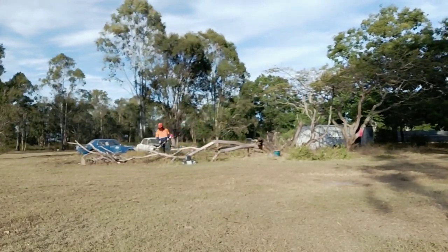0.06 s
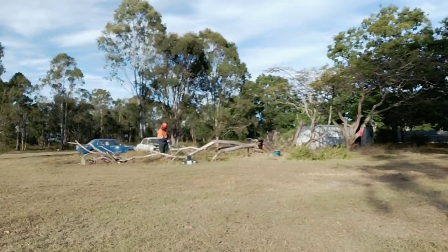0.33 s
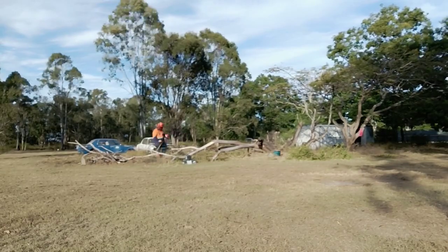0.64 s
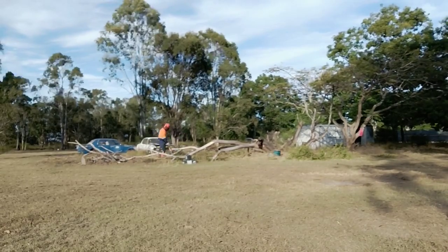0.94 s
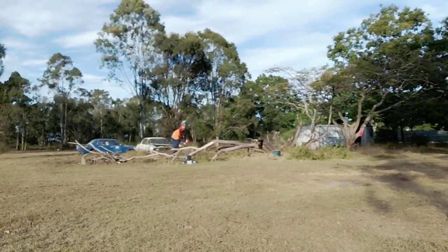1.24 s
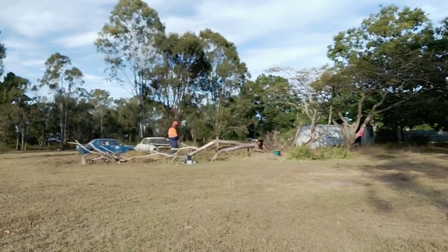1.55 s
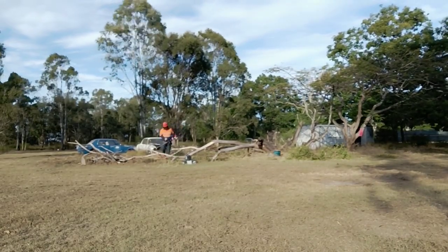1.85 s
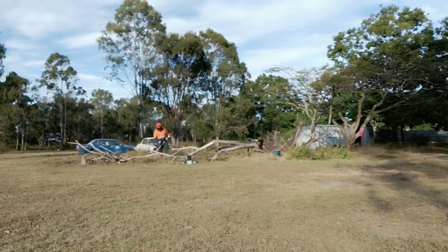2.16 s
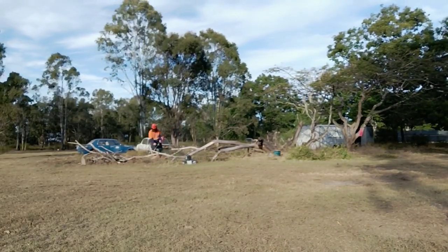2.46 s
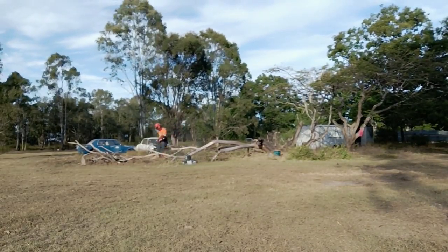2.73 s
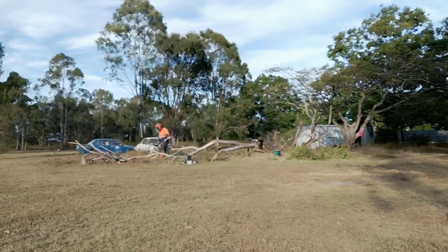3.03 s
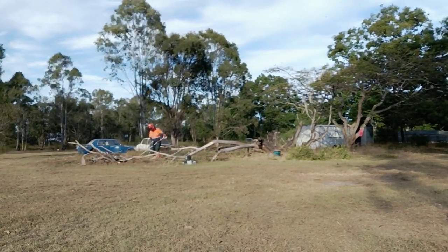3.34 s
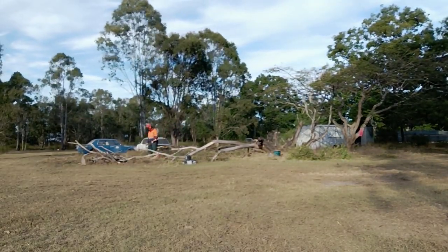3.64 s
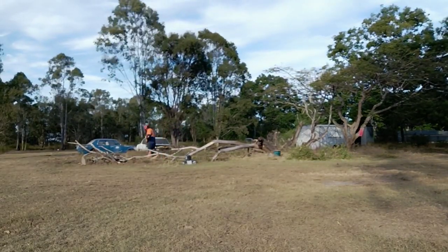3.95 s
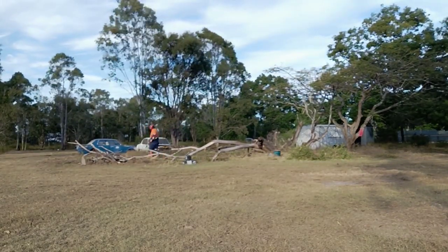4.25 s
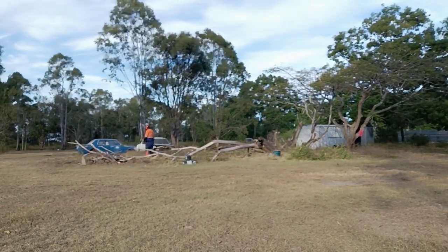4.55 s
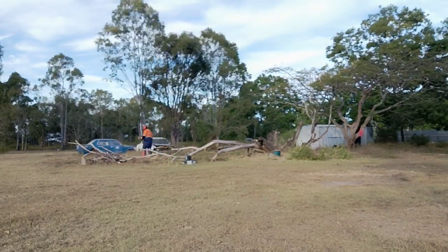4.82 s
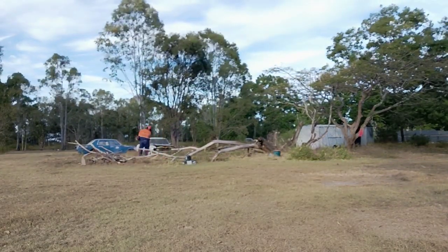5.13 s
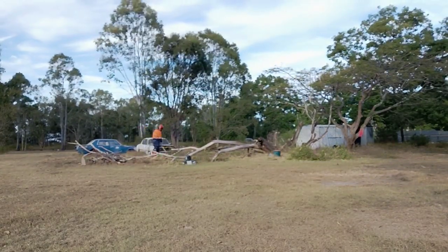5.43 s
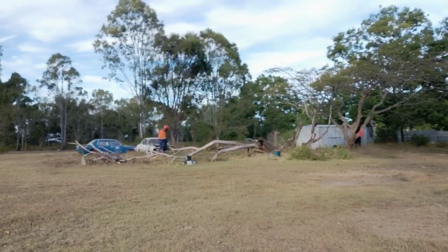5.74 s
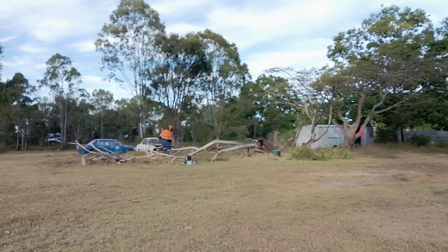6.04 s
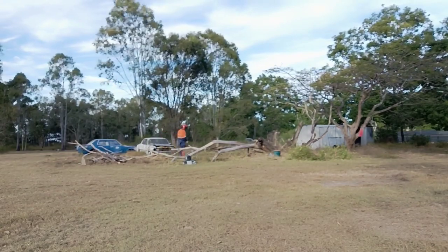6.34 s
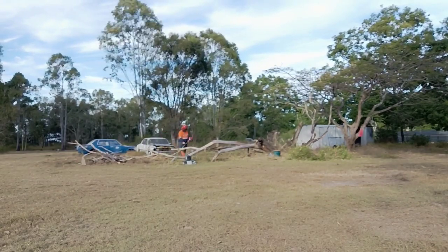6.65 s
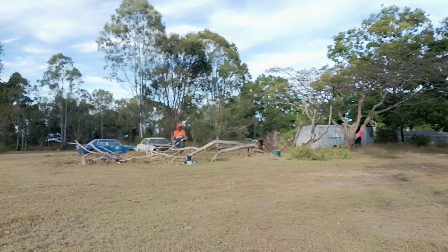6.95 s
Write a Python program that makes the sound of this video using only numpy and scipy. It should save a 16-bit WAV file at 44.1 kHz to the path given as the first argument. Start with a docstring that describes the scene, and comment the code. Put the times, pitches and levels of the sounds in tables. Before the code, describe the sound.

Wind rumbles and crackles on the microphone while a distant brushcutter buzzes, its pitch sagging at each cut and climbing back.

```python
"""A two-stroke brushcutter whines high and shrill, some way off in an open paddock. One engine speed drives its
whine, buzz, gear tone and pulsed hiss. Each bite into the weeds drags the speed down and the engine pulls it
back; now and then the throttle shuts and it winds down. Gusts rumble, crackle and pop on two microphone ports.
A few faint whistles glide in the distance."""
import sys
import numpy as np
from scipy import signal
from scipy.fft import rfft, irfft, next_fast_len
from scipy.io import wavfile

SR = 44100
rng = np.random.default_rng(int(sys.argv[2]) if len(sys.argv) > 2 else 0)


def wrap_up_sound(samples):
    """Save the sound to the file named by the first command line argument, as 16-bit audio."""
    columns = np.atleast_2d(samples).T
    # keep every value between -1 and 1, then stretch to whole-number steps
    tamed = np.clip(columns, -1, 1)
    steps = np.round(tamed * 32767).astype(np.int16)
    wavfile.write(sys.argv[1], SR, steps)


N = 308126
T = np.arange(N) / SR
HOP = 32  # samples per control step
TOP_HZ, IDLE_HZ = 611.8, 231.5  # engine speed, as the base pitch of the buzz
WHINE_ORDER, GEAR_ORDER, OCTAVE_ORDER, SHRILL_ORDER = 3, 3.717, 6, 9  # multiples of that pitch

# blade bites into weeds: middle_s, length_s, braking_hz
BITES = [(0.009, 0.037, 59), (0.085, 0.057, 70), (0.149, 0.095, 76), (0.209, 0.059, 243),
         (0.275, 0.072, 146), (0.358, 0.044, 136), (0.44, 0.058, 310), (0.527, 0.053, 62),
         (0.609, 0.054, 290), (0.847, 0.121, 303), (0.906, 0.11, 116), (0.995, 0.13, 280),
         (1.117, 0.031, 21), (1.183, 0.019, 39), (1.487, 0.12, 106), (1.982, 0.063, 188),
         (1.992, 0.063, 206), (2.073, 0.084, 78), (2.121, 0.067, 133), (2.216, 0.052, 183),
         (2.283, 0.057, 154), (2.353, 0.034, 160), (2.424, 0.048, 312), (2.506, 0.067, 183),
         (2.731, 0.062, 220), (2.837, 0.061, 165), (2.909, 0.095, 90), (2.996, 0.04, 125),
         (3.082, 0.042, 65), (3.165, 0.036, 129), (3.252, 0.09, 227), (3.332, 0.05, 348),
         (3.354, 0.057, 163), (3.462, 0.15, 144), (3.558, 0.041, 63), (3.669, 0.086, 53),
         (3.811, 0.06, 196), (3.895, 0.054, 143), (3.989, 0.066, 124), (4.102, 0.035, 40),
         (4.186, 0.046, 82), (4.27, 0.025, 102), (4.386, 0.073, 283), (4.478, 0.042, 124),
         (4.577, 0.047, 283), (4.677, 0.056, 190), (4.767, 0.04, 148), (4.802, 0.059, 131),
         (4.876, 0.098, 116), (4.984, 0.11, 99), (5.034, 0.065, 56), (5.136, 0.045, 42), (5.191, 0.028, 81),
         (5.323, 0.056, 57), (5.398, 0.025, 76), (5.503, 0.027, 47), (5.589, 0.043, 120),
         (5.667, 0.032, 75), (5.748, 0.031, 43), (5.877, 0.022, 45), (5.969, 0.024, 35), (6.081, 0.052, 66),
         (6.171, 0.024, 12.2), (6.269, 0.033, 49), (6.336, 0.039, 13.7), (6.642, 0.076, 42),
         (6.721, 0.099, 57)]
# throttle shut: start_s, end_s
COASTS = [(.682, .798), (1.546, 1.931), (2.575, 2.693), (6.775, 7.1)]
# full-speed levels as the worker turns and moves: time_s, whine_db, rasp_db
FACING = [(0, -40.5, -37.5), (0.65, -40, -39.5), (1.0, -41, -46), (1.35, -43, -41), (1.9, -44.5, -41.5),
          (2.15, -38, -35.5), (2.6, -41, -35.5), (2.8, -36.5, -36.5), (3.4, -37, -38.5), (3.8, -36.5, -39),
          (4.4, -36, -38.5), (5.0, -37, -41.5), (5.25, -46.5, -42), (5.7, -48.5, -40.5), (6.22, -45, -46),
          (6.42, -42, -42.5), (6.68, -40.5, -41.5), (6.95, -43, -37.5)]
# cutting head swings aside: middle_s, rasp_loss_db
SWINGS = [(0.55, 4.5), (1.2, 0.5), (1.38, 6), (2.54, 7.5), (5.275, 6), (5.455, 5.5), (5.61, 7.5),
          (5.809, 13.5), (6.02, 6), (6.21, 5.5), (6.401, 7), (6.56, 6)]
# upper partials standing out of the hiss: time_s, gain_db
CLARITY = [(0, -0.5), (1.4, 2), (2.1, 1), (2.7, -2), (3.3, 2), (3.6, 2.5), (4.5, 0), (5, 4.5), (5.3, 1.5),
           (6.3, 8.5), (6.45, 3), (6.99, -3.5)]
# buzz spectral envelope: frequency_hz, gain_db
BUZZ_SPECTRUM = [(600, -20), (1200, -13.5), (2400, -13.5), (3000, -11.5), (3600, -11.5), (4200, -19),
                 (4800, -18), (6000, -20.5), (7300, -22.5), (8700, -14.5), (9900, -18), (15500, -18),
                 (19000, -58)]
# whine overtones within the buzz: buzz_order, gain_db
OVERTONES = [(6, 2), (9, 6), (12, 0.5), (15, 6.5), (18, 4.5), (21, 4.5), (24, 7), (27, 8), (30, 6),
             (33, 7.5)]
# shrill overtone at three times the whine: time_s, gain_db
SHRILL = [(0, -7), (0.65, -3), (0.95, 2), (1.5, -4.5), (2.2, -5.5), (2.8, -7.5), (3.7, -6), (3.85, 0.5),
          (4.6, -3), (5.2, 4.5), (6.3, 2), (6.45, -3.5)]
# machine hiss common to both ports: frequency_hz, gain_db
HISS_SPECTRUM = [(200, -34), (700, -2.5), (1800, 3), (2700, -1.5), (3400, -3), (4500, -3.5), (6500, -6.5),
                 (8300, 0.5), (10000, -0.5), (12500, 2.5), (15800, -3.5)]
# machine hiss differing between ports: frequency_hz, gain_db
HISS_SIDE_SPECTRUM = [(200, -35), (700, -3), (1800, -41), (2700, -74), (4500, -34), (6500, 31), (8300, 35),
                      (12500, 38), (15800, 36)]
# breeze strength: time_s, level_db
BREEZE = [(0.0, -36.7), (0.2, -37.5), (0.4, -47), (0.55, -42.5), (0.75, -41), (0.95, -38), (1.1, -40),
          (1.5, -37), (1.65, -42.5), (2.0, -46.5), (2.55, -60), (3.3, -54), (4.6, -54), (5.4, -47.5),
          (6.1, -56), (6.45, -73), (6.99, -58)]
# gusts above the breeze: middle_s, length_s, level_db
GUSTS = [(0.225, 0.016, -35), (0.52, 0.019, -38.8), (0.915, 0.029, -33), (0.951, 0.028, -33),
         (1.017, 0.024, -34), (1.068, 0.018, -36), (1.244, 0.11, -38), (1.451, 0.03, -37.5),
         (1.698, 0.02, -52), (1.943, 0.1, -46.5), (2.099, 0.045, -45.5), (2.34, 0.12, -45.5),
         (2.641, 0.1, -47.5), (3.052, 0.03, -50), (3.175, 0.16, -49.5), (4.28, 0.042, -45),
         (4.833, 0.035, -43), (5.177, 0.13, -47), (5.466, 0.1, -46), (5.708, 0.023, -43),
         (5.83, 0.088, -50.5), (5.992, 0.02, -44.5), (6.271, 0.022, -53.5), (6.673, 0.097, -51.5),
         (6.883, 0.014, -50.1), (6.962, 0.015, -55)]
# wind rumble: frequency_hz, gain_db
RUMBLE_SPECTRUM = [(25, -24), (110, -33), (200, -19), (300, -10.5), (450, -2.5), (750, 1.5), (1200, -0.5),
                   (1800, -10.5), (2600, -41), (4000, -45), (8000, -53)]
# crackle of hard gusts: frequency_hz, gain_db
CRACKLE_SPECTRUM = [(200, -32), (700, -1.5), (1500, 3.5), (2500, -1.5), (4000, -12), (6000, -22),
                    (12000, -53)]
# still air: frequency_hz, gain_db
AIR_SPECTRUM = [(25, 1), (60, -1), (120, -0.5), (250, 3), (400, 12), (1000, -8), (3000, -33), (15000, 3.5)]
# sharpest eddies: start_s, level_db
BUFFETS = [(0.153, -26.5), (0.199, -26), (0.238, -18.5), (0.498, -26), (0.551, -26.5), (0.748, -24.5),
           (0.858, -23.5), (0.912, -24), (0.946, -25), (1.014, -31), (1.058, -27), (1.154, -24.5),
           (1.451, -21), (1.61, -26), (1.694, -32), (1.93, -25), (5.458, -27), (5.803, -35), (5.983, -32),
           (6.88, -40), (6.961, -39)]
# distant whistles: start_s, end_s, first_hz, last_hz, level_db
WHISTLES = [(2.366, 2.855, 1078, 1076, -50.5), (3.242, 3.7, 851, 1387, -52.5),
            (3.531, 4.073, 596, 947, -51.5), (4.172, 4.559, 706, 803, -56), (4.841, 5.079, 1108, 1156, -55)]


def amp(db):
    """Decibels to gain."""
    return np.exp(np.asarray(db) * (np.log(10) / 20))


def unit_rms(x):
    """Scale to rms 1."""
    return x / np.sqrt(np.mean(x ** 2) + 1e-20)


def follow(rows):
    """Columns of a time table, at every sample."""
    time_s, *columns = np.transpose(rows)
    return [np.interp(T, time_s, column) for column in columns]


def gain_at(spectrum, hz):
    """Gain of a spectrum table, interpolated in log frequency."""
    frequency_hz, gain_db = np.transpose(spectrum)
    return amp(np.interp(np.log(hz + 1), np.log(frequency_hz), gain_db))


def colour(x, spectrum):
    """Filter by a spectrum table, keeping the power of white noise."""
    size = next_fast_len(N + 4096)
    response = unit_rms(gain_at(spectrum, np.fft.rfftfreq(size, 1 / SR)))
    return irfft(rfft(x, size) * response, size)[..., :N]


def wander(rate_hz, step=1):
    """Random curve of rms 1, rate_hz new values a second, read every step samples."""
    values = rng.standard_normal(8000)
    return unit_rms(np.interp(T[::step] * rate_hz, np.arange(len(values)), values))


def engine(max_pull_hz_per_s=5306, settle_s=0.03, coast_s=0.149, throttle_s=0.013):
    """Speed and throttle closure (0-1): pulls to top speed, brakes in bites, coasts toward idle."""
    t, step_s = T[::HOP], HOP / SR
    shut = sum(np.clip(np.minimum(t - start_s, end_s - t) / throttle_s, 0, 1)
               for start_s, end_s in COASTS)
    drag = np.zeros(len(t))
    for middle_s, length_s, braking_hz in BITES:
        progress = np.clip((t - middle_s) / length_s + 0.5, 0, 1)
        drag += 2 * braking_hz / length_s * np.sin(np.pi * progress) ** 2
    hz, speed_hz = TOP_HZ, []
    for brake, closed in zip(drag.tolist(), shut.tolist()):
        pull = min((TOP_HZ - hz) / settle_s, max_pull_hz_per_s)
        hz += step_s * ((1 - closed) * pull - closed * (hz - IDLE_HZ) / coast_s - brake)
        speed_hz.append(hz)
    return np.interp(T, t, speed_hz), np.interp(T, t, shut)


def machine_levels(hz, shut, swing_s=0.027, unsteady_db=1.63):
    """Whine and rasp sink with speed and throttle; a head swing hides the rasp and shows the whine."""
    whine_db, rasp_db = follow(FACING)
    sag = 1 - hz / TOP_HZ
    aside_db = sum(loss_db * np.exp(-((T - middle_s) / swing_s) ** 2) for middle_s, loss_db in SWINGS)
    whine_db = whine_db - 9.5 * sag - 3 * shut * (1 + sag)
    rasp_db = rasp_db - 8.5 * sag - 5 * shut - aside_db + unsteady_db * wander(22)
    exposed_whine = amp(-69.5) * aside_db
    return 20 * np.log10(amp(whine_db) + exposed_whine), rasp_db


def buzz(cycles, hz, whine_db, rasp_db, shut, flicker_db=2.5, smear_cycles=0.36):
    """Partials nearly in phase, one tick a cycle; load thins them to the whine's overtones."""
    hz, whine_db, rasp_db, shut = hz[::HOP], whine_db[::HOP], rasp_db[::HOP], shut[::HOP]
    sag = 1 - hz / TOP_HZ
    load = np.tanh((sag / 0.16) ** 2) * (1 - shut)
    overtone_db = {round(order): db for order, db in OVERTONES}
    thinning_db = -30 * sag - 4 * load
    orders = (set(range(1, 27)) - {WHINE_ORDER}) | set(overtone_db)
    out = np.zeros((2, N))
    for order in sorted(orders):
        rasp_share = np.clip((order - 2) / 7.17, 0, 1)  # low partials follow the whine
        level_db = (1 - rasp_share) * (whine_db - 3) + rasp_share * rasp_db
        level_db += overtone_db.get(order, thinning_db) + flicker_db * wander(80, HOP)
        if order == SHRILL_ORDER:
            level_db += follow(SHRILL)[0][::HOP] + 6 * load
        if order == OCTAVE_ORDER:
            level_db += 4 * shut  # comes forward as the blade coasts
        else:
            level_db -= 6 * shut + 1.5 * rasp_share * load
        lean = amp(-0.66 * min(order / 6, 1) * wander(21, HOP))  # short waves reach the ports unequally
        gain = gain_at(BUZZ_SPECTRUM, order * hz) * amp(level_db) * np.array([lean, 1 / lean])
        offset_cycles = smear_cycles * rng.uniform(-0.56, 0.54)
        partial = np.sin(2 * np.pi * (order * cycles + offset_cycles))
        out += np.repeat(gain, HOP, axis=1)[:, :N] * partial
    return out


def hiss(cycles, depth=1.4, decay_cycles=0.13, flutter_db=0.97, side_db=-7.5):
    """Rushing noise: one strong and two weak bursts per buzz cycle, mostly alike in both ports."""
    age_cycles = cycles % (1 / 3)
    strength = np.where(cycles % 1 < 1 / 3, 1, 0.42)
    bursts = unit_rms(1 + depth * strength * np.exp(-age_cycles / decay_cycles))
    mid = colour(bursts * rng.standard_normal(N), HISS_SPECTRUM)
    side = amp(side_db) * colour(bursts * rng.standard_normal(N), HISS_SIDE_SPECTRUM)
    return amp(flutter_db * wander(160)) * np.array([mid + side, mid - side])


def brushcutter(jitter=0.002524, waver_db=1.1):
    """One unsteady speed drives whine, gear tone, buzz and hiss."""
    hz, shut = engine()
    whine_db, rasp_db = machine_levels(hz, shut)
    clarity_db, = follow(CLARITY)
    roughness = 0.002965 + 0.0125 * shut + 0.0072 * (1 - hz / TOP_HZ)  # rougher coasting or labouring
    unrest = jitter * wander(90) + roughness * wander(600)
    cycles = np.cumsum(hz * (1 + unrest)) / SR
    whine = amp(whine_db + waver_db * wander(110)) * np.sin(2 * np.pi * WHINE_ORDER * cycles)
    gear_db = rasp_db - 12 + 25 * (hz / hz.max() - 1) + 2 * wander(60)
    gear = amp(gear_db) * np.sin(2 * np.pi * GEAR_ORDER * cycles)
    partials = amp(-0.25) * buzz(cycles, hz, whine_db, rasp_db + clarity_db, shut)
    compressed_rasp_db = rasp_db.mean() + 0.64 * (rasp_db - rasp_db.mean())
    hiss_db = compressed_rasp_db - 5 - 0.19 * clarity_db
    return np.sqrt(2) * (whine + gear + partials) + amp(hiss_db) * hiss(cycles)


def off_centre(stereo, lag_s=9e-6, left_db=-0.5):
    """Sound reaches the left port slightly later and weaker."""
    left, right = stereo
    size = next_fast_len(N + 4096)
    delay = np.exp(-2j * np.pi * np.fft.rfftfreq(size, 1 / SR) * lag_s)
    late_left = irfft(rfft(left, size) * delay, size)[:N]
    return np.array([amp(left_db) * late_left, right])


def wind(rumble_db=0.5, crackle_db=6, lump_db=3.5, grain_db=3, ceiling_db=6.5, lean_db=3.5):
    """Eddies hit each port separately; hard gusts are brighter and favour the left."""
    gust_power = sum(amp(db) ** 2 * np.exp(-(2 * (T - middle_s) / length_s) ** 2)
                     for middle_s, length_s, db in GUSTS)
    breeze_db, = follow(BREEZE)
    level_db = 10 * np.log10(amp(breeze_db) ** 2 + gust_power)
    eddies_db = [lump_db * wander(130) + grain_db * wander(900) for _ in range(2)]
    eddies = np.array([unit_rms(amp(np.minimum(db, ceiling_db))) for db in eddies_db])
    force = amp(level_db - level_db.max())
    lean = amp(lean_db * np.tanh(11 * force) * np.array([[1], [-1]]))
    rumble = amp(level_db + rumble_db) * lean * eddies * rng.standard_normal((2, N))
    crackle = amp(level_db + crackle_db) * force * eddies * rng.standard_normal((2, N))
    return colour(rumble, RUMBLE_SPECTRUM) + colour(crackle, CRACKLE_SPECTRUM)


def still_air(level_db=-65):
    """Faint steady noise of the open air."""
    return amp(level_db) * colour(rng.standard_normal((2, N)), AIR_SPECTRUM)


def buffets(gain_db=11, centre_hz=1150, decay_s=0.00029, leak=0.072, low_cut_hz=380):
    """Each sharp eddy is a pop of about one cycle, mainly at one port."""
    out = np.zeros((2, N))
    t = np.arange(-100, 200) / SR
    for start_s, level_db in BUFFETS:
        detune, phase_cycles, port_draw = rng.random(3)
        pitch_hz = centre_hz * (0.75 + 0.5 * detune)
        pop = np.exp(-abs(t) / decay_s) * np.cos(2 * np.pi * (pitch_hz * t + phase_cycles))
        pan = [1, leak] if port_draw < 0.65 else [leak, 1]
        span = out[:, round(start_s * SR):][:, :len(t)]
        span += amp(level_db + gain_db) * np.outer(pan, pop)[:, :span.shape[1]]
    return signal.sosfilt(signal.butter(3, low_cut_hz, "high", fs=SR, output="sos"), out)


def whistles(jitter=0.00303, fade_s=0.034, waver_db=2):
    """Thin far-off tones, most gliding upward."""
    out = np.zeros(N)
    for start_s, end_s, first_hz, last_hz, level_db in WHISTLES:
        hz = np.interp(T, [start_s, end_s], [first_hz, last_hz]) * (1 + jitter * wander(80))
        swell = np.clip(np.minimum(T - start_s, end_s - T) / fade_s, 0, 1)
        out += amp(level_db + waver_db * wander(40)) * swell * np.sin(2 * np.pi * np.cumsum(hz) / SR)
    return out


def scene():
    """Stereo mix of machine, wind, whistles and air."""
    air = still_air()
    return off_centre(brushcutter()) + wind() + buffets() + whistles() + air


def record(dry):
    """Steep low-pass at 15780 Hz."""
    low_pass = signal.firwin(1023, 15780, window=("kaiser", 9), fs=SR)
    return signal.oaconvolve(dry, low_pass[None], "same")


dry = scene()
out = record(dry)
wrap_up_sound(out)
```